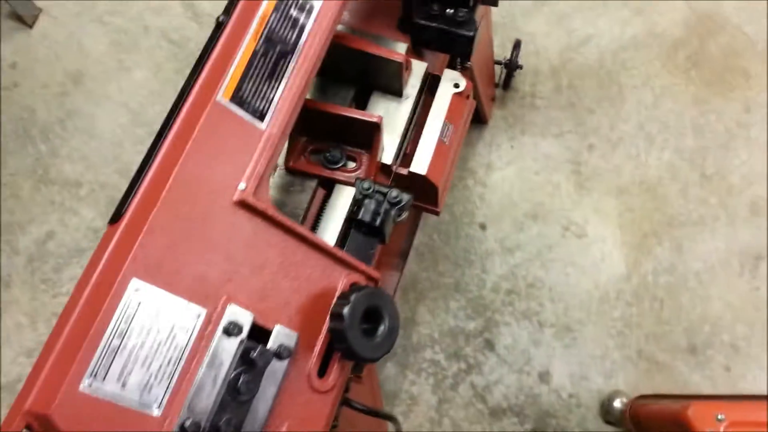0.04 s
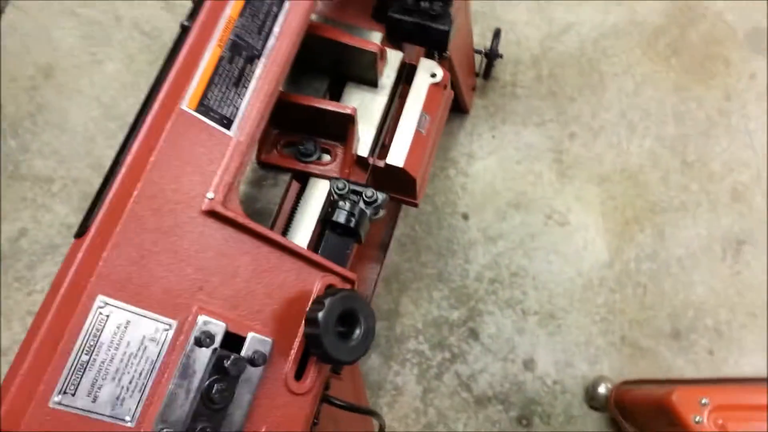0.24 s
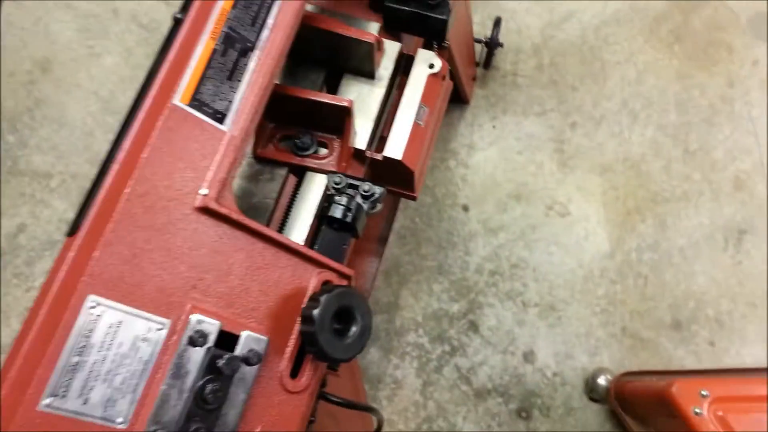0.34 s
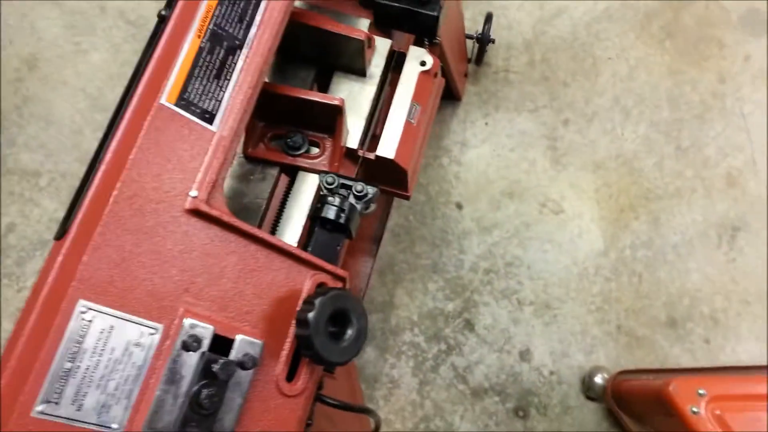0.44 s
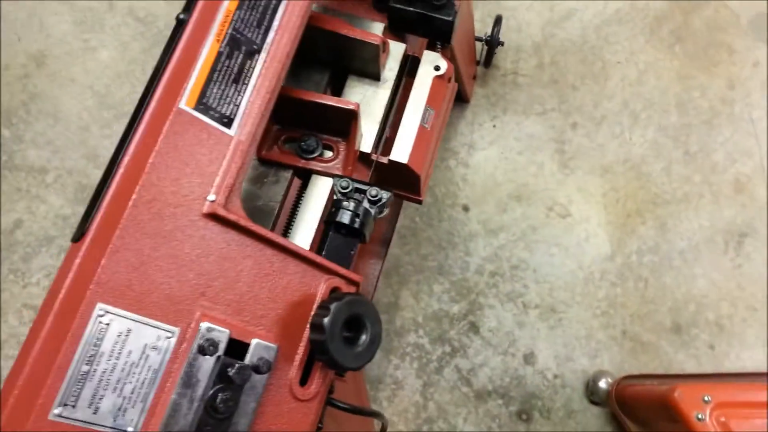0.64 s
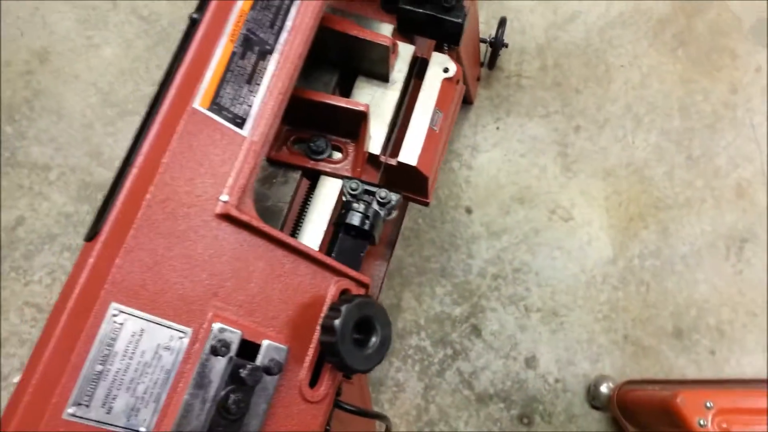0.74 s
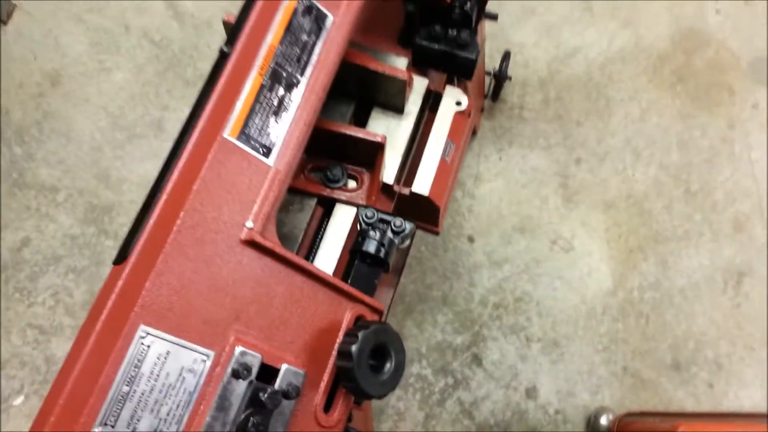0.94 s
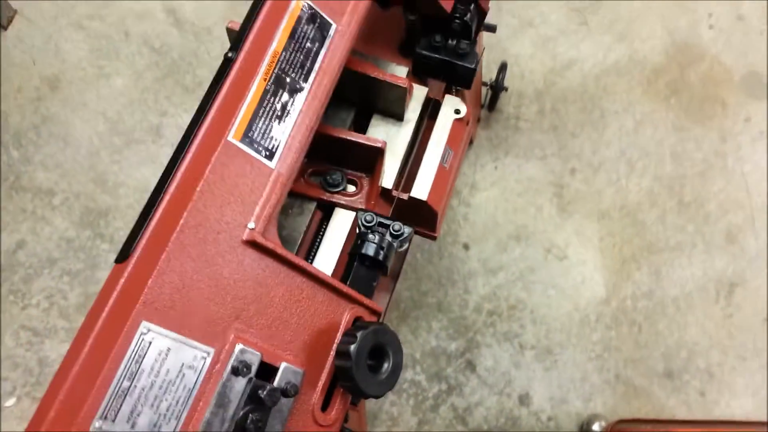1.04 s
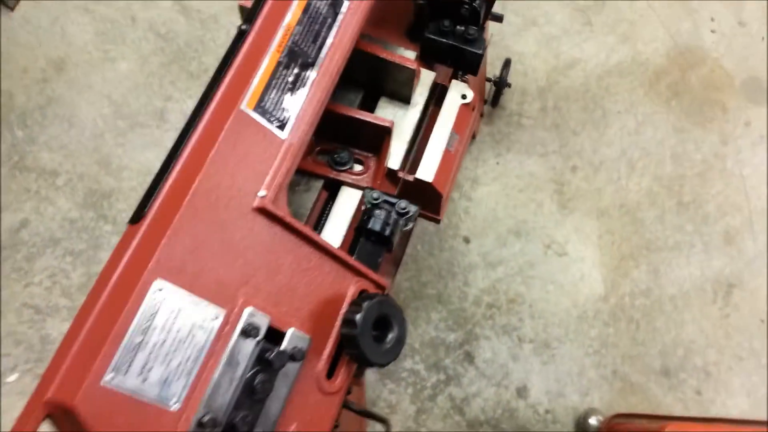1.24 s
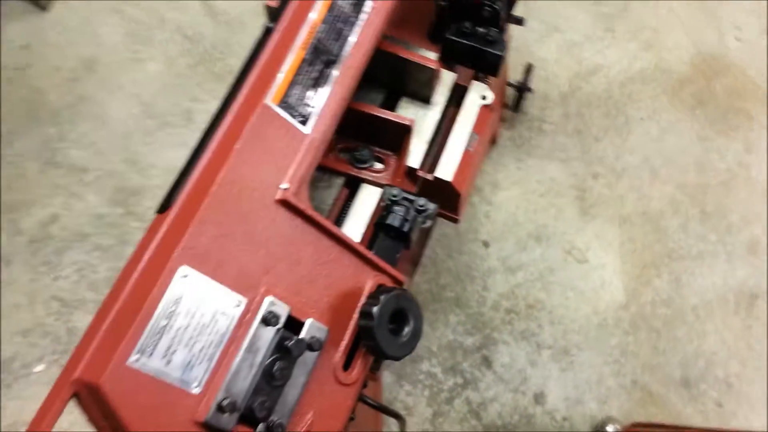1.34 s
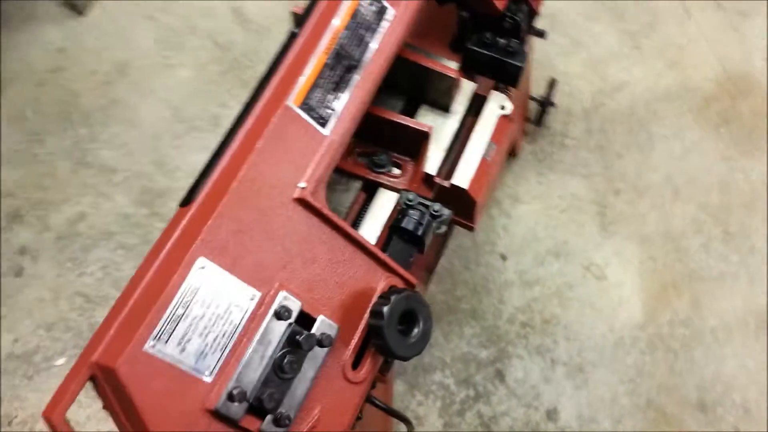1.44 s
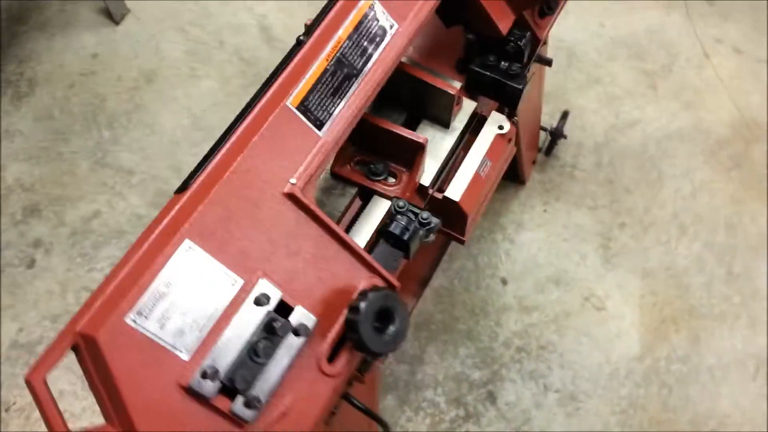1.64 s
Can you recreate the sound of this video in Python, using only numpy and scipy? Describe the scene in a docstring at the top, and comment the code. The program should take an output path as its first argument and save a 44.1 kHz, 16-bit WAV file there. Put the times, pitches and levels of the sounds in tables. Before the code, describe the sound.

One sharp metallic knock on a steel bandsaw frame, rattling and fading in a quiet workshop.

```python
"""In a quiet workshop, the steel frame of a bandsaw is knocked once. The contact gives a sharp ping
and a crack; the frame then rings in its normal modes, and a few loose rattles excite the clang of
its sheet metal again. A limiter ducks at the blow and recovers as the ringing decays. A faint squeak,
small taps and soft friction scuffs, as of shoes on concrete, sound over the hush of the room."""
import sys
import numpy as np
from scipy import signal
from scipy.io import wavfile
from scipy.ndimage import uniform_filter1d

SR = 44100
rng = np.random.default_rng(int(sys.argv[2]) if len(sys.argv) > 2 else 0)


def dump(signal):
    """Clip the signal to [-1, 1] and save it as 16-bit WAV at the path in sys.argv[1]."""
    limited = np.clip(np.atleast_2d(signal).T, -1, 1)
    pcm = np.round(limited * 32767).astype(np.int16)
    wavfile.write(sys.argv[1], SR, pcm)


N = 74970
T = np.arange(N) / SR
BAND_EDGES_HZ = np.geomspace(22, 16000, 29)
BAND_CENTRES_HZ = np.sqrt(BAND_EDGES_HZ[1:] * BAND_EDGES_HZ[:-1])

# the knock, then its rattles: (time [s], gain at 1 kHz [dB], tilt [dB/octave])
CONTACTS = [(0.2013, 2.5, 0), (0.251, -10, -1), (.304, -8.5, 0.5), (0.363, -13.5, -2), (.505, -61, 9),
            (0.557, -39.5, -5)]
KNOCK_S = CONTACTS[0][0]
# stereo coherence of the frame's noise: (frequency [Hz], left-right correlation [-1 to 1])
FRAME_COHERENCE = [(100, .95), (400, 0.95), (700, .65), (1200, 0.028), (2500, 0.3), (5000, -0.14),
                   (9000, -.1)]
# stereo coherence of the room's sounds: (frequency [Hz], left-right correlation [-1 to 1])
ROOM_COHERENCE = [(40, 0.0076), (200, 0.19), (500, 0.33), (1200, 0.027), (4000, 0.33), (12000, 0.58)]


def from_db(db):
    """Amplitude ratio: a factor of ten for every 20 dB."""
    return 10 ** (np.asarray(db) / 20)


def at_hz(points, hz):
    """Interpolation of a table along logarithmic frequency."""
    points = np.array(points)
    return np.interp(np.log(hz), np.log(points[:, 0]), points[:, 1])


def panned(db):
    """Constant-power panning: two gains for a left-minus-right level difference."""
    gains = from_db(np.array([[db], [-db]]) / 2)
    return gains / np.sqrt(np.mean(gains ** 2))


def decay(t, t60):
    """Exponential damping: full level until t = 0, then 60 dB down every t60 seconds."""
    return np.exp(-np.log(1000) * np.maximum(t, 0) / t60)


def delayed(x, seconds):
    """Pure time delay of a stereo signal."""
    return np.pad(x, ((0, 0), (int(seconds * SR), 0)))[:, :N]


def band_noise(low, high):
    """Band-limited noise: two uncorrelated channels, rms 1."""
    bandpass = signal.butter(2, [low, high], "band", fs=SR, output="sos")
    noise = signal.sosfilt(bandpass, rng.standard_normal((2, N + SR // 4)))[:, -N:]
    return noise / noise.std()


def noise_bands(spectrum, coherence):
    """Incoherent addition: third-octave bands of stereo noise whose powers sum to 1."""
    gains = from_db(at_hz(spectrum, BAND_CENTRES_HZ)) * np.sqrt(np.diff(BAND_EDGES_HZ))
    gains /= np.linalg.norm(gains)
    bands = []
    for low, high, hz, gain in zip(BAND_EDGES_HZ, BAND_EDGES_HZ[1:], BAND_CENTRES_HZ, gains):
        mid, side = band_noise(low, high)
        correlation = np.clip(at_hz(coherence, hz), -1, 1)
        common = np.sqrt((1 + correlation) / 2) * mid
        opposed = np.sqrt((1 - correlation) / 2) * side * np.array([[1], [-1]])
        bands.append(gain * (common + opposed))
    return np.array(bands)


def room_hush():
    """Ambient noise: a steady background, only partly coherent between left and right."""
    # spectrum of the hush: (frequency [Hz], relative density [dB])
    spectrum = [(25, -14), (55, -28), (110, -6.5), (200, -0.5), (380, 3), (600, -4), (1100, -8.5),
                (2600, -12.5), (5000, -20.5), (14000, -18)]
    return from_db(-59.5) * noise_bands(spectrum, ROOM_COHERENCE).sum(axis=0)


def stroke(t, rise, hold, t60):
    """Envelope of a slide: linear rise, hold and exponential decay."""
    return np.clip(t / rise, 0, 1) * decay(t - rise - hold, t60)


def shoe_scuffs():
    """Sliding friction: the sole grips with a low gritty sound, then slips with a hiss."""
    # slides: (start [s], rise [s], hold [s], T60 [s], level [dB], pan [dB], relative grit [dB],
    # hiss tilt about 3 kHz [dB/octave])
    slides = [(-.05, 0.021, 0.028, 0.41, -46, 3, -8.5, -0.5), (1.18, 0.041, .04, 0.21, -47.5, 3.5, -14, 1),
              (1.265, 0.014, 0.0087, 0.15, -51.5, 1, -7.5, 3.5),
              (1.335, 0.05, 0.014, 0.39, -46.5, 2.5, -2, 1.5), (1.651, 0.024, .03, .3, -65, -1.5, -10, 1)]
    # spectra of slip and grip: (frequency [Hz], relative density [dB])
    hiss_spectrum = [(300, -21), (1200, -5), (2400, 0), (3800, -4.5), (5000, -14), (7000, -19.5),
                     (12000, -25.5), (15000, -27)]
    grit_spectrum = [(150, -20), (450, -0.5), (820, 10.5), (1300, -10), (3000, -29), (6000, -19.5),
                     (13000, -13.5)]
    grit_lead_s = 0.0141
    hiss_bands = noise_bands(hiss_spectrum, ROOM_COHERENCE)
    grit_noise = noise_bands(grit_spectrum, ROOM_COHERENCE).sum(axis=0)
    octaves = np.log2(BAND_CENTRES_HZ / 3000)
    out = 0
    for start, rise, hold, t60, db, pan, grit_db, tilt in slides:
        hiss = np.tensordot(from_db(tilt * octaves), hiss_bands, 1) * stroke(T - start, rise, hold, t60)
        grit = from_db(grit_db) * grit_noise * stroke(T - start + grit_lead_s, rise, hold, t60)
        out += from_db(db) * panned(pan) * (hiss + grit)
    return out


def contact_ping():
    """Impact excitation: hard contact rings high, short-lived modes; a nearby surface reflects them."""
    # modes of the ping: (frequency [Hz], level [dB], T60 [s])
    modes = [(5013, 9, 0.0095), (4740, -11, 0.093), (4890, -16.5, 0.098), (4060, -17.5, 0.0873),
             (7830, -13.5, 0.018)]
    rise_s, reflection_s, reflection_db = 0.0011, 0.003, -11.5
    t = np.maximum(T - KNOCK_S, 0)
    ring = sum(from_db(db) * np.sin(2 * np.pi * hz * t) * decay(t, t60) for hz, db, t60 in modes)
    direct = panned(db=7) * ring * np.minimum(t / rise_s, 1)
    return direct + from_db(reflection_db) * delayed(direct, reflection_s)


def contact_crack():
    """Impact transient: a brief force radiates a broadband snap from the point of contact."""
    # spectrum of the snap: (frequency [Hz], relative density [dB])
    spectrum = [(30, -6.5), (100, -19), (400, 6.5), (1700, 5), (2800, -16.5), (8000, -11.5), (13000, -15.5),
                (15000, -27)]
    noise = noise_bands(spectrum, FRAME_COHERENCE).sum(axis=0)
    return from_db(-13) * delayed(noise * decay(T, t60=0.07), KNOCK_S)


def struck(ring, hz):
    """Superposition: a band answers every contact, as strongly as that contact excites its frequency."""
    octaves = np.log2(hz / 1000)
    return sum(from_db(db + tilt * octaves) * delayed(ring, time) for time, db, tilt in CONTACTS)


def panel_clang():
    """Modal overlap: dense panel modes and the room blend into decaying noise; the lows build slower."""
    # spectra of the clang and of its faint lingering ring: (frequency [Hz], relative density [dB])
    clang_spectrum = [(30, -36), (60, -62.5), (115, -23.5), (200, -12.5), (290, -3), (450, 3.5), (600, -8),
                      (950, -5.5), (1800, -4.5), (2700, -10), (4700, -11), (6000, -18.5), (12500, -31),
                      (14500, -51)]
    linger_spectrum = [(100, -18.5), (350, 8), (800, -5), (1700, -2), (3500, -7.5), (7000, -18),
                       (14000, -19.5)]
    # damping of the clang: (frequency [Hz], T60 [s])
    decay_times = [(100, 0.38), (400, 0.56), (1000, 0.53), (2000, 0.51), (4000, 0.39), (8000, 0.24),
                   (14000, .26)]
    # stereo balance: (frequency [Hz], left minus right [dB])
    balance = [(60, -11), (150, -0.5), (380, -0.5), (950, 1.0), (2380, 6.5), (5980, -1.5), (15000, -2.5)]
    build_cycles, longest_build_s = 3.6, 0.02
    clang_bands = from_db(-9) * noise_bands(clang_spectrum, FRAME_COHERENCE)
    linger_bands = from_db(-46.5) * noise_bands(linger_spectrum, FRAME_COHERENCE)
    out = 0
    for hz, clang, linger in zip(BAND_CENTRES_HZ, clang_bands, linger_bands):
        ring = clang * decay(T, at_hz(decay_times, hz)) + linger * decay(T, t60=2.59)
        swell = 1 - np.exp(-T / min(build_cycles / hz, longest_build_s))
        out += struck(ring * swell * panned(at_hz(balance, hz)), hz)
    return out


def frame_modes():
    """Normal modes: damped tones swell as the blow spreads through the frame, and a close pair beats."""
    # the frame's clear modes besides the pair: (frequency [Hz], relative level [dB], T60 [s])
    other_modes = [(116, -30, .42), (272, -23, .55), (291, -17, .62), (356, -14, .55), (482, -16, .58),
                   (521, -13, .53), (636, -9.5, .62), (659, -20, .55), (684, -18, .58), (997, -23, .55),
                   (1056, -23, .62), (1173, -21, .58), (1218, -22, .65), (1528, -19, .55), (1610, -51, 2.6),
                   (1658, -19, .58), (1798, -48, 1.4), (1921, -22, .58), (2222, -22, .55), (2524, -25, .6),
                   (2781, -24, .5)]
    main_hz, beat_hz, others_gain_db = 391, 3.1, -2
    rise_s, left_lag_s, pan_db_per_octave = 0.048, 0.0001, 2.5
    modes = [(main_hz, -24.5, 1.23), (main_hz + beat_hz, -7, 0.63)]
    modes += [(hz, db + others_gain_db, t60) for hz, db, t60 in other_modes]
    t = np.maximum(T - KNOCK_S - np.array([[left_lag_s], [0]]), 0)
    out = 0
    for hz, db, t60 in modes:
        pan = panned(pan_db_per_octave * max(np.log2(hz / main_hz), 0))   # higher modes lie further left
        out += pan * from_db(db) * np.sin(2 * np.pi * hz * t) * decay(t, t60)
    return out * (1 - np.exp(-t / rise_s))


def frame_squeak():
    """Narrow-band noise is heard as pitch: two brief chirps step down as the frame settles."""
    # Gaussian bursts: (peak time [s], frequency [Hz], level [dB], standard deviation [s])
    chirps = [(.648, 5640, -63.5, 0.016), (.661, 4530, -55, .012)]
    bandwidth_hz = 73
    out = 0
    for time, hz, db, sigma in chirps:
        envelope = np.exp(-((T - time) / sigma) ** 2 / 2)
        out += from_db(db) * band_noise(hz - bandwidth_hz / 2, hz + bandwidth_hz / 2) * envelope
    return out


def small_taps():
    """Heavily damped impacts: dull ticks close by that die away without ringing."""
    # taps: (time [s], level [dB], T60 [s])
    taps = [(.666, -41, 0.029), (1.347, -50, 0.023), (1.6454, -44.5, 0.021)]
    # spectrum of a tap: (frequency [Hz], relative density [dB])
    spectrum = [(150, -21), (500, 1.5), (1300, -14), (3000, -11), (8000, -33), (14000, -30)]
    noise = noise_bands(spectrum, ROOM_COHERENCE).sum(axis=0)
    return sum(from_db(db) * delayed(noise * decay(T, t60), time) for time, db, t60 in taps)


def scene():
    """Linear superposition: the pressures from the frame, the small sounds and the room add."""
    hush = room_hush()
    frame = contact_ping() + contact_crack() + panel_clang() + frame_modes() + frame_squeak()
    return frame + shoe_scuffs() + small_taps() + hush


def record(dry):
    """Look-ahead limiting: the gain ducks at once and recovers steadily; a low-pass cuts the top."""
    threshold_db, release_db_per_s, window_s, stopband_hz = -17.5, 39.5, 0.0245, 15250
    power = uniform_filter1d(np.mean(dry ** 2, axis=0), int(window_s * SR))
    level_db = 10 * np.log10(np.abs(power) + 1e-12)
    excess_db = np.maximum(level_db - threshold_db, 0)
    recovery_db = release_db_per_s * T
    duck_db = np.maximum.accumulate(excess_db + recovery_db) - recovery_db
    lowpass = signal.cheby2(16, 70, stopband_hz, fs=SR, output="sos")
    return signal.sosfilt(lowpass, dry * from_db(-duck_db))


dry = scene()
out = record(dry)
dump(out)
```